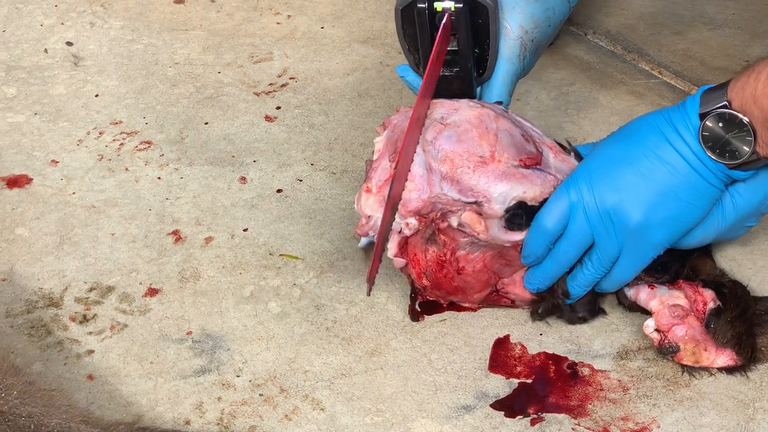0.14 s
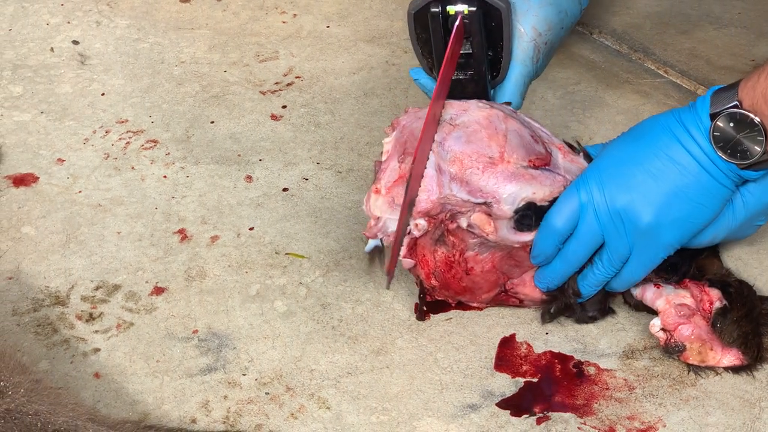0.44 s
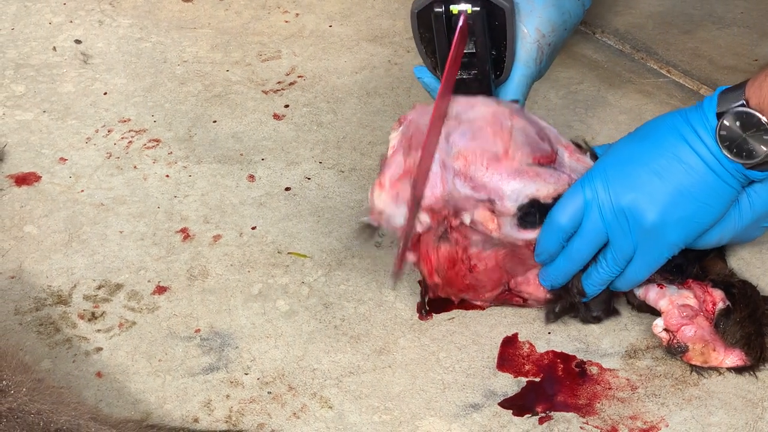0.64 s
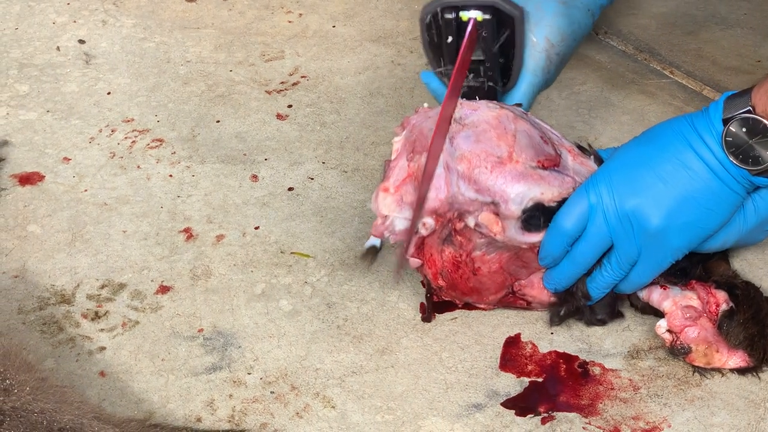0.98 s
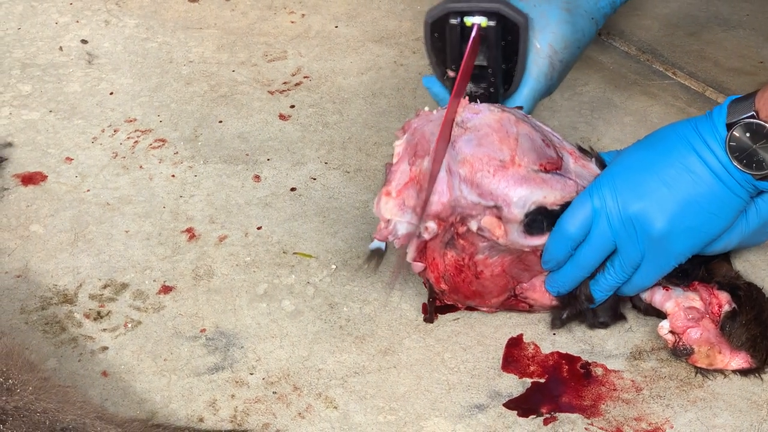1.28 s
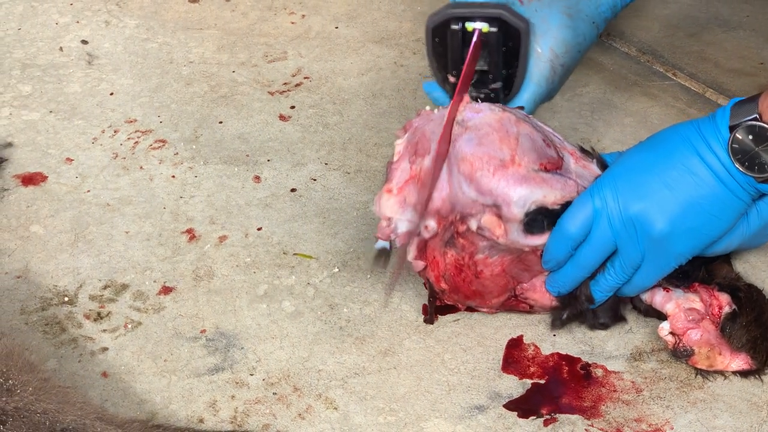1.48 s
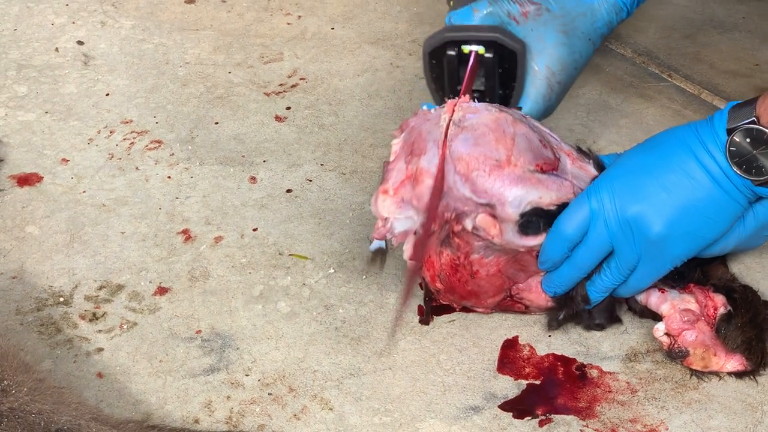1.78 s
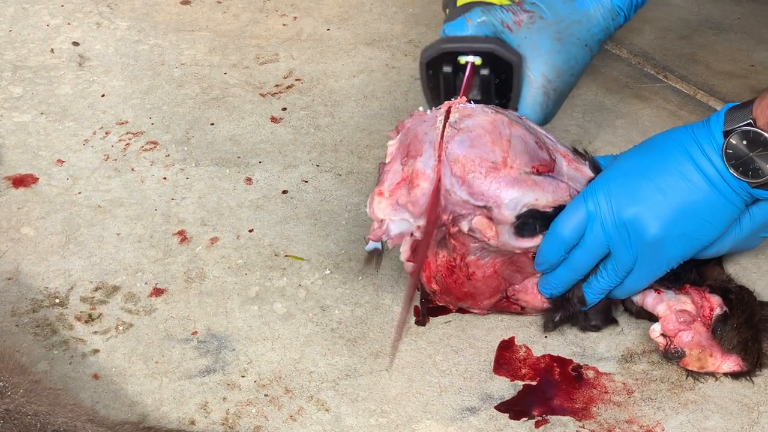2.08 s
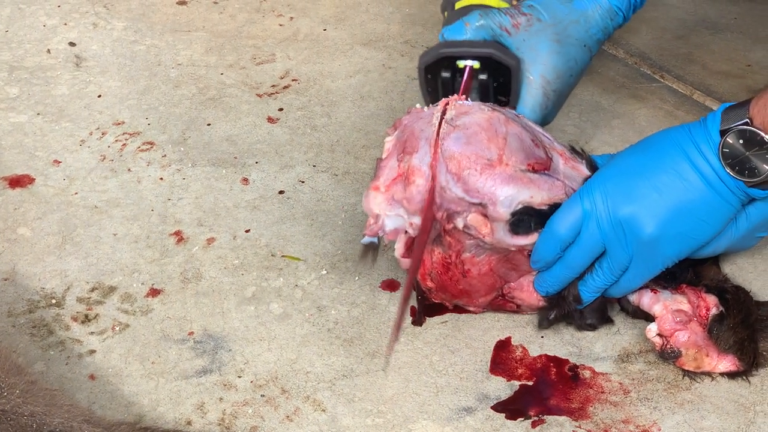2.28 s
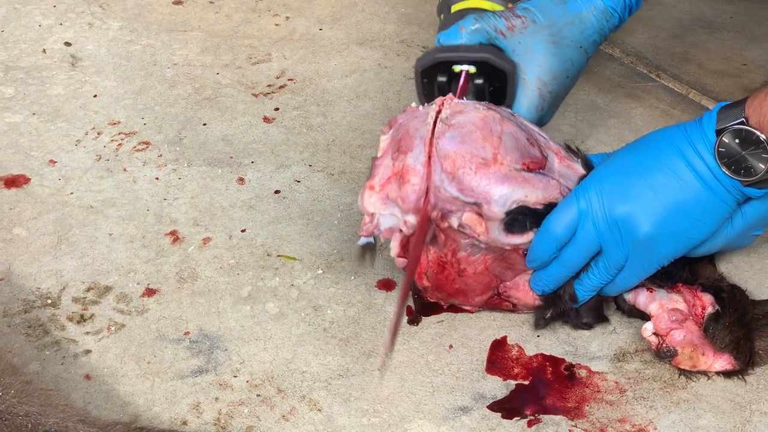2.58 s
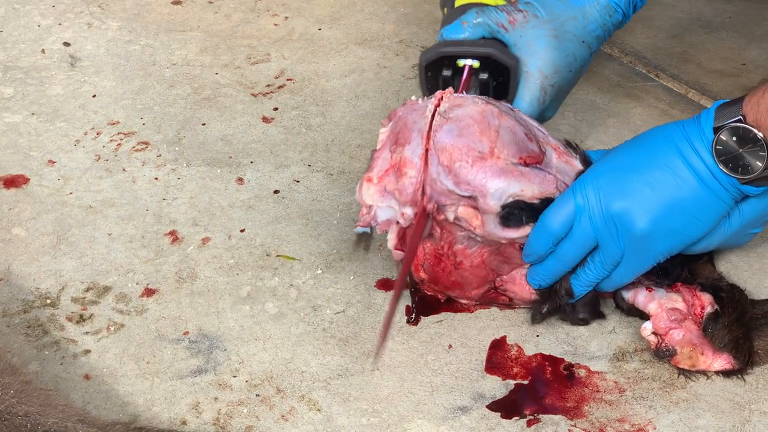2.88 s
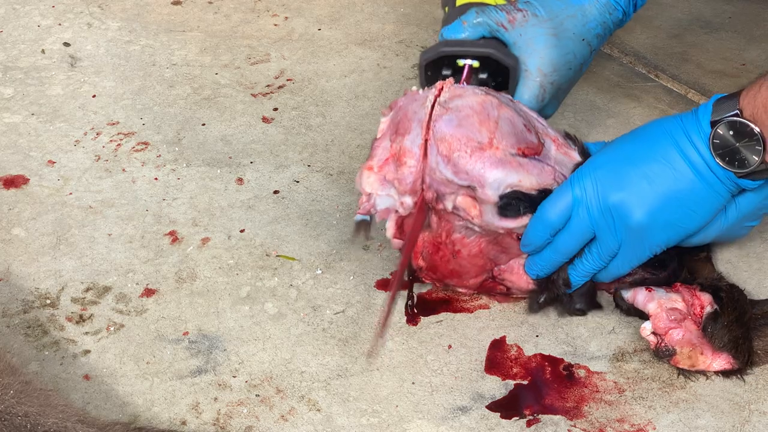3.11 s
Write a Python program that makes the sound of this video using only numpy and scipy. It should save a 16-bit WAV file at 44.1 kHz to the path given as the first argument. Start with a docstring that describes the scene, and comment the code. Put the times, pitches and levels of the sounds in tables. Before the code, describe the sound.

A cordless reciprocating saw clicks on and grinds loudly, steadily through bone in an echoing barn.

```python
"""A cordless reciprocating saw cuts through bone on the concrete floor of a barn: toothed noise rings the
saw and the bone, bursts knock at each end of the stroke, and narrow noise screeches where the blade binds.
Sine tones make the spinning motor and crank, a split carrier the whistle of the drive, short bursts the trigger.
Decaying noise is the echo of an earlier burst, which opens the scene before the trigger clicks.
Thumps of handling, rumbling and puffing air on the microphone and a quiet noise floor lie behind."""
import sys
import numpy as np
from scipy import signal
from scipy.fft import rfft, irfft
from scipy.io import wavfile
from scipy.ndimage import uniform_filter1d

SR = 44100
rng = np.random.default_rng(int(sys.argv[2]) if len(sys.argv) > 2 else 0)


def to_wav(s):
    """Save 16-bit WAV."""
    ch = np.atleast_2d(s).T  # columns
    pcm = np.round(np.clip(ch, -1, 1) * 32767)  # PCM
    wavfile.write(sys.argv[1], SR, pcm.astype(np.int16))


N = 143325
T, HZ = np.arange(N) / SR, np.fft.rfftfreq(2 * N, 1 / SR)
GEAR_RATIO = 7.32  # motor turns per blade stroke


def amp(db):
    """Decibels to gain."""
    return 10 ** (np.asarray(db) / 20)


def unit(x):
    """Scales to rms 1."""
    return x / np.sqrt(np.mean(x ** 2) + 1e-20)


def curve(rows, axis=1):
    """One column of a time table at every sample."""
    rows = np.array(rows)
    return np.interp(T, rows[:, 0], rows[:, axis])


def read(points, hz=HZ):
    """A frequency table on a log axis."""
    f, value = np.transpose(points)
    return np.interp(np.log(hz + 1), np.log(f + 1), value)


def shape(x, gain):
    """Filters by a gain per frequency."""
    return irfft(rfft(x, 2 * N) * gain)[..., :N]


def noise(colour):
    """Noise of rms 1 with the given spectrum."""
    return unit(shape(rng.standard_normal(N), amp(read(colour))))


def drift(hz):
    """Slow random movement of rms 1, up to the given rate."""
    return unit(shape(rng.standard_normal(N), 1 / (1 + (HZ / hz) ** 4)))


def blows(rows, t60, gain):
    """Sudden noise bursts that die away, coloured by a gain per frequency."""
    level = sum((T >= s) * amp(db - 60 * abs(T - s) / t60) for s, db in rows)
    return shape(level * rng.standard_normal(N), unit(gain))


# Where the teeth bite. Each row: place in the stroke (0-1), strength in dB over the steady scraping.
BITE_PLACES = [(.38, -1.5), (.6, -5), (.86, -9)]
BITE_LENGTH = 0.055  # decay, as a share of a stroke
CHIPS_PER_S, CHIP_SPREAD_DB, CHIP_SHARE = 2600, 2, 0.51  # share of the power of the grit
GRAB_DB, GRAB_HZ = 0.83, 46.6  # the blade catches unevenly: rms swing and top rate


def teeth(stroke):
    """Scraping and tiny chips, surging each time the teeth bite."""
    bite = sum(amp(db) * np.exp(-((stroke - place) % 1) / BITE_LENGTH) for place, db in BITE_PLACES)
    sign = rng.choice([-1, 1], N)
    size = amp(CHIP_SPREAD_DB * np.minimum(rng.exponential(1, N), 4))
    chips = sign * size * (rng.random(N) < CHIPS_PER_S / SR)
    scraping = rng.standard_normal(N)
    grit = np.sqrt(CHIP_SHARE) * unit(chips) + np.sqrt(1 - CHIP_SHARE) * scraping
    return unit(grit * (1 + bite) * amp(GRAB_DB * drift(GRAB_HZ)))


def rattle(stroke, count=90):
    """Gear and slider noise that repeats with each stroke: harmonics in random phase."""
    return unit(sum(np.cos(2 * np.pi * (k * stroke + rng.random())) for k in range(1, count)))


# Broad colour of the cut. Each row: frequency in Hz, relative level in dB.
CUT_COLOUR = [(40, -45), (130, -18), (300, -14), (430, -6.5), (680, -5.5), (1080, 3.5), (1600, -0.5),
              (2050, -2), (3600, -3), (5300, -1.5), (7400, -10.5), (9300, -5), (10300, -3.5), (12500, -7.5),
              (14400, -13.5), (14900, -22)]
# Resonances of housing, bone and blade. Each row: centre in Hz, width in Hz, boost in dB.
SAW_RESONANCES = [(515, 215, 7.5), (1323, 64, 7), (1704, 134, 5), (2207, 95, 2.5), (2840, 130, 5),
                  (4620, 190, 2.5), (6390, 1000, 4.5), (8110, 410, 11.5), (8615, 400, 8.5), (12860, 230, 7),
                  (14400, 1000, 8)]


def saw_colour():
    """Gain per frequency of saw and bone together: broad colour plus resonant peaks."""
    peaks = sum(db / (1 + (2 * (HZ - hz) / width) ** 2) for hz, width, db in SAW_RESONANCES)
    return amp(read(CUT_COLOUR) + peaks)


# Level of the cut, before the barn. Each row: time in seconds, body in dB, rasp in dB, treble in dB.
CUT_LEVELS = [(.55, -91, -76, -87), (.655, -37.5, -52, -52), (.68, -29.5, -42, -42), (.72, -23, -27, -31.5),
              (.77, -22, -23.5, -22.5), (.88, -21.5, -27, -23.5), (1.03, -22.5, -26.5, -22),
              (1.23, -24, -30, -22.5), (1.37, -26.5, -31, -26), (1.59, -26, -29, -27),
              (1.73, -26.5, -29.5, -28.5), (1.95, -27, -34, -27.5), (2.39, -27.5, -33, -26.5),
              (2.48, -24.5, -29, -26.5), (2.77, -25.5, -29, -27), (2.9, -27, -33.5, -25),
              (3.25, -27, -32, -24.5)]
BODY_TOP_HZ, RASP_TOP_HZ = 3920, 8070
RATTLE_SHARE = 0.087  # share of the body's power that repeats on every stroke
# the finest fizz is muffled as the blade sinks into the cut
FIZZ_HZ, FIZZ_START_DB, FIZZ_FADE_DB_PER_S = 8800, 4, 3


def cutting(stroke):
    """Teeth and rattle ring the saw and the bone; body, rasp and treble have their own levels."""
    grit, colour = teeth(stroke), saw_colour()
    low = 1 / (1 + (HZ / BODY_TOP_HZ) ** 10)
    not_high = 1 / (1 + (HZ / RASP_TOP_HZ) ** 20)
    scraped_body = unit(shape(grit, colour * low))
    rattling_body = unit(shape(rattle(stroke), colour * low))
    body = np.sqrt(1 - RATTLE_SHARE) * scraped_body + np.sqrt(RATTLE_SHARE) * rattling_body
    rasp = unit(shape(grit, colour * (not_high - low)))
    treble = unit(shape(grit, colour * (1 - not_high)))
    fizz = shape(treble, 1 - 1 / (1 + (HZ / FIZZ_HZ) ** 16))
    treble = treble + fizz * (amp(FIZZ_START_DB - FIZZ_FADE_DB_PER_S * T) - 1)
    body_gain, rasp_gain, treble_gain = [amp(curve(CUT_LEVELS, column)) for column in (1, 2, 3)]
    return body * body_gain + rasp * rasp_gain + treble * treble_gain


# Single extra knocks. Each row: time in seconds, strength in dB relative to an ordinary knock.
EXTRA_KNOCKS = [(1.186, 3), (1.595, 3.5), (1.658, -1), (2.2646, 0), (2.572, -1), (2.633, -9), (2.6947, -5),
                (2.8787, -6)]
# Ring of the knocks. Each row: frequency in Hz, relative level in dB.
KNOCK_RING = [(100, -15), (330, -18.5), (470, -1), (700, -8), (1050, -3), (1350, -0.5), (1650, -1.5),
              (2000, -11), (2850, -1), (3600, -14), (6000, -39), (15000, -32)]
KNOCK_DB = -7  # all knocks together, against the body of the cut
KNOCK_SPREAD_DB, KNOCK_BOUT_HZ, RETURN_DB = 2.5, 23, -8
KNOCK_JITTER, KNOCK_DECAY_S = 0.037, 0.0016  # jitter in half strokes


def knocks(stroke):
    """The blade knocks as it turns round, weaker on the return, in bouts; a few single knocks are added."""
    half = np.floor(2 * stroke + KNOCK_JITTER * drift(60))
    turning = np.diff(half, prepend=half[0]) > 0
    bouts = np.clip(drift(KNOCK_BOUT_HZ), -2, 1.3)
    hits = turning * amp(KNOCK_SPREAD_DB * bouts + RETURN_DB * (half % 2))
    for s, db in EXTRA_KNOCKS:
        hits[round(s * SR)] += amp(db)
    burst = signal.lfilter([1], [1, -np.exp(-1 / (KNOCK_DECAY_S * SR))], hits)
    ring = unit(shape(burst * rng.standard_normal(N), amp(read(KNOCK_RING))))
    return ring * amp(curve(CUT_LEVELS) + KNOCK_DB)


# The blade binds in the cut. Each row: middle in seconds, length in seconds, level in dB, pitch in Hz.
BINDING_CATCHES = [(0.752, 0.017, -20.5, 2370), (0.772, 0.01, -22, 2540), (0.789, 0.01, -20, 2780),
                   (.968, 0.018, -26, 2610), (1.58, 0.0084, -20.5, 2250), (1.597, 0.024, -26.5, 2880),
                   (1.636, 0.016, -28, 2230)]
CATCH_WIDTH_HZ, CHATTER_DB = 430, 6.5  # chatter swings this far up and down


def catches(turns):
    """The blade binds in brief narrow-band screeches, chattering once every two motor turns."""
    out = np.zeros(N)
    for s, length, db, hz in BINDING_CATCHES:
        band = 1 / (1 + (2 * (HZ - hz) / CATCH_WIDTH_HZ) ** 4)
        screech = unit(shape(rng.standard_normal(N), band))
        out += screech * amp(db) * np.exp(-(2 * (T - s) / length) ** 2)
    return out * amp(CHATTER_DB * np.sin(np.pi * turns))


# Motor shaft spinning up. Each row: time in seconds, speed in Hz.
SPIN_UP_SPEED = [(.635, 0), (.66, 45), (.69, 150), (.74, 290), (.80, 350)]
# Motor shaft sagging under load. Each row: time in seconds, speed in Hz.
LOADED_SPEED = [(.86, 366), (.95, 369), (1.15, 362), (1.45, 361), (1.72, 356.5), (2.05, 363), (2.2, 363),
                (2.4, 357), (2.7, 356), (3.0, 355), (3.25, 350)]
WOBBLE = .003  # rms, as a share of the speed


def shaft_speed():
    """The shaft spins up, then sags under load, with a slight random wobble."""
    return curve(list(SPIN_UP_SPEED) + list(LOADED_SPEED)) * (1 + WOBBLE * drift(14))


# Hum of the crank. Each row: multiple of the stroke rate, level in dB at full speed and reference load.
CRANK_HUM = [(3, -49.5), (5, -48), (7, -51), (9, -43.5), (10, -42), (11, -43), (17, -47.5), (27, -55)]
# Tone of the motor shaft. Each row: time in seconds, level in dB.
SHAFT_TONE = [(.6, -90), (.74, -48), (.82, -39), (.92, -30.5), (1.1, -40.5), (1.22, -36), (1.65, -43),
              (2.07, -38), (2.15, -50.5), (2.65, -43.5), (3.25, -47.5)]
CRANK_LOAD_SHARE, CRANK_BODY_DB = 0.57, -25.5  # dB of hum per dB of body; body level at reference load
FAN_ORDER, FAN_DB = 8, -42.5  # tones per turn; level at full speed
FLUTTER = 0.24  # rms unevenness of every tone's amplitude


def motor(speed, turns):
    """Tones locked to shaft, fan and crank; fan and crank grow with speed, the crank also with load."""
    def tone(cycles):
        """Sine of rms 1 with a slow random flutter."""
        return np.sqrt(2) * np.sin(2 * np.pi * (cycles + rng.random())) * (1 + FLUTTER * drift(4.9))
    crank = sum(amp(db) * tone(round(k) * turns / GEAR_RATIO) for k, db in CRANK_HUM)
    crank = crank * amp(CRANK_LOAD_SHARE * (curve(CUT_LEVELS) - CRANK_BODY_DB))
    fan = amp(FAN_DB) * tone(FAN_ORDER * turns)
    shaft = amp(curve(SHAFT_TONE)) * tone(turns)
    return shaft + (speed / speed.max()) ** 2 * (crank + fan)


# Switching whistle of the drive. Each row: time in seconds, level in dB.
WHISTLE_LEVEL = [(0, -53), (.1, -65), (.3, -99), (.526, -100), (.534, -49.5), (.64, -51), (.68, -38),
                 (.745, -34), (.85, -55)]
# Colour of the energised motor's buzz. Each row: frequency in Hz, relative level in dB.
BUZZ_COLOUR = [(200, -11), (700, -11.5), (1100, 1.5), (1500, -6), (2500, -12.5), (4700, -15), (7200, -23),
               (8300, -14), (11000, -26), (12700, -16), (15000, -34)]
# The motor buzzes as it brakes and as it is switched on again.
# Each row: start in seconds, starting level in dB before the rise, fade in dB per second.
MOTOR_BUZZES = [(.004, -36.5, 172), (0.531, -38.5, 55)]
WHISTLE_HZ, WHISTLE_WIDTH_HZ, WHISTLE_DITHER_HZ = 10060, 115, 400  # centre, rms wander, top wander rate
SIDEBAND_ORDER = 4.6  # sidebands lie this many shaft rates either side
BUZZ_RISE_S, BUZZ_ROUGH_DB = 0.004, -0.5


def drive(turns):
    """The energised motor buzzes; the switching whistle splits in two as the shaft starts to turn."""
    whistle_hz = WHISTLE_HZ + WHISTLE_WIDTH_HZ * drift(WHISTLE_DITHER_HZ)
    carrier = np.sin(2 * np.pi * np.cumsum(whistle_hz) / SR)
    split = unit(carrier * np.cos(2 * np.pi * SIDEBAND_ORDER * turns))
    whistle = split * amp(curve(WHISTLE_LEVEL))
    current = np.zeros(N)
    for s, db, fade in MOTOR_BUZZES:
        current += np.clip((T - s) / BUZZ_RISE_S, 0, 1) * amp(db - fade * abs(T - s))
    return whistle + noise(BUZZ_COLOUR) * current * amp(BUZZ_ROUGH_DB * drift(70))


# Jolts of the motor and gear slack. Each row: start in seconds, crack in dB, ring in dB.
JOLTS = [(.005, -32, -32.5), (.535, -36.5, -34), (0.571, -38, -39), (.670, -22.5, -36)]
# Modes of the housing. Each row: frequency in Hz, level in dB relative to the ring, t60 in seconds.
HOUSING_MODES = [(1065, -6, 0.15), (1076, 0, 0.14), (1325, -18, 0.13), (1520, -11, 0.063),
                 (1666, -8.5, 0.21), (2780, -13, .07)]
# Ticks of the trigger. Each row: start in seconds, level in dB.
TRIGGER_TICKS = [(.539, -45), (.5715, -33)]
# Thin colour of the ticks. Each row: frequency in Hz, relative level in dB.
TRIGGER_COLOUR = [(300, -17), (1400, 0), (3000, -16), (11800, -17), (12700, 4), (13600, -12), (15500, -1)]
CRACK_T60_S, TICK_T60_S = 0.022, 0.028


def clicks():
    """Short knocks that set decaying sine modes of the housing ringing, and thin noise ticks of the trigger."""
    ring = np.zeros(N)
    for s, _, ring_db in JOLTS:
        age = np.maximum(T - s, 0)
        for hz, db, t60 in HOUSING_MODES:
            ring += amp(ring_db + db - 60 * age / t60) * np.sin(2 * np.pi * hz * age)
    cracks = blows([row[:2] for row in JOLTS], CRACK_T60_S, saw_colour())
    ticks = blows(TRIGGER_TICKS, TICK_T60_S, amp(read(TRIGGER_COLOUR)))
    return ring + cracks + ticks


# Decay of the barn. Each row: frequency in Hz, t60 in seconds.
BARN_DECAY = [(100, 1), (1000, 1.6), (4000, 1.7), (9000, 0.37), (15000, 0.54)]


def die_away(x):
    """Lets each band fade at the pace of the barn."""
    hz, t, z = signal.stft(x, SR, nperseg=256)
    fade = amp(-60 * t / read(BARN_DECAY, hz)[:, None])
    return signal.istft(z * fade, SR, nperseg=256)[1][..., :x.shape[-1]]


def reflections(early_db=14, early_s=0.011):
    """Response of floor and barn at the two ports, even in level over frequency."""
    t = T[:SR]
    early = 1 + amp(early_db) * np.exp(-t / early_s)
    tail = die_away(rng.standard_normal((2, SR))) * (t > .001) * early
    wet = rfft(tail, 2 * N)
    return wet / np.sqrt(uniform_filter1d(abs(wet) ** 2, size=2000, axis=1))


# Share of direct sound. Each row: frequency in Hz, share of the power (0-1).
DIRECT_SHARE = [(200, 1), (500, 0.69), (680, 0.34), (1200, 0.9), (2100, 0.33), (2850, 0.42), (3700, 0.07),
                (5200, 0.61), (8200, 0.61), (10200, 1), (15000, 1)]
# Phase between the microphone ports. Each row: frequency in Hz, lead of the left in radians.
PORT_LEAD = [(300, 0), (1400, .3), (1950, -1.9), (2500, .2), (4500, 1.4), (5500, 3.1), (6200, 6.6),
             (7100, 9.4), (8400, 10.1), (9100, 8.2), (10200, 6.3), (11950, 3.1), (13300, .2), (14300, -1.6),
             (14800, -3.1), (16000, -3.6)]
SWAY_CYCLE_HZ = 3.5  # the tool moves about, so its reflections keep changing


def barn(x, count=4):
    """Direct sound at two ports, plus reflection patterns that swell in turn as the tool moves."""
    share = np.clip(read(DIRECT_SHARE), 0, 1)
    ports = np.exp(1j * read(PORT_LEAD) * np.array([[.5], [-.5]]))
    sway = [np.maximum(np.sin(2 * np.pi * (SWAY_CYCLE_HZ * T + k / count)), 0) for k in range(count)]
    wet = sum(rfft(x * weight, 2 * N) * reflections() for weight in sway)
    direct = rfft(x, 2 * N) * np.sqrt(share) * ports
    return irfft(direct + np.sqrt(1 - share) * wet)[:, :N]


# Balance of the microphone ports. Each row: frequency in Hz, left minus right in dB.
PORT_LEVELS = [(250, 0), (480, -5), (900, -0.5), (5000, 0.5), (5800, -6), (7500, 4.5), (8150, -8),
               (8900, -2.5), (10000, 0)]


def balance_ports(x):
    """Tilts left against right, half the difference on each port."""
    return shape(x, amp(read(PORT_LEVELS) * np.array([[.5], [-.5]])))


# Colour of the echo. Each row: frequency in Hz, relative level in dB.
ECHO_COLOUR = [(100, -39), (500, 16), (750, -3), (950, -15), (1080, 9.5), (1350, -2), (1650, -2),
               (2100, -16), (2700, -7), (4000, -17), (7200, -11), (8300, 2), (9300, 0), (13000, -12),
               (15500, -27)]


def earlier_echo(start_db=-42.5):
    """Dying echo of an earlier burst: separate noise at each port, fading at the barn's pace."""
    return amp(start_db) * die_away(np.array([noise(ECHO_COLOUR), noise(ECHO_COLOUR)]))


# Dull bumps of handling. Each row: start in seconds, level in dB.
HANDLING_BUMPS = [(.003, -34), (.027, -22), (.078, -25), (.184, -26.5), (.667, -23), (1.792, -28.5),
                  (2.755, -34)]
# Colour of the bumps. Each row: frequency in Hz, relative level in dB.
HANDLING_COLOUR = [(30, -16), (90, 1.5), (280, 2), (550, -9.5), (900, -37), (3000, -45), (12000, -56)]


def handling(t60_s=0.13):
    """Dull thumps of handling: low noise bursts that die away."""
    return blows(HANDLING_BUMPS, t60_s, amp(read(HANDLING_COLOUR)))


# Air on the microphone. Each row: time in seconds, level in dB.
WIND_LEVEL = [(0, -33), (.03, -25), (.09, -32), (.14, -36), (.23, -32.5), (.33, -42.5), (.38, -39),
              (.5, -35), (.57, -35.5), (.65, -35), (.68, -23), (.79, -20), (.87, -38), (.93, -28),
              (1.06, -39.5), (1.25, -33), (1.35, -49), (1.66, -45), (1.71, -39), (1.76, -50), (1.85, -34.5),
              (1.97, -44), (2.05, -50), (2.4, -50), (2.47, -40), (2.71, -37.5), (2.81, -30), (2.88, -46),
              (3.03, -36.5), (3.1, -44), (3.25, -43)]
# Colour of the rumble. Each row: frequency in Hz, relative level in dB.
RUMBLE_COLOUR = [(20, -24), (38, -4.5), (60, 4.5), (110, -1.5), (200, -8.5), (350, -17.5), (700, -32.5),
                 (2000, -45), (8000, -66)]
# Single puffs of air. Each row: start in seconds, peak level in dB, starting pitch in Hz.
AIR_PUFFS = [(0.183, -13, 200), (0.366, -35, 149), (0.441, -29.5, 190), (0.542, -24.5, 109),
             (0.671, -14, 90), (0.693, -21, 111), (0.719, -13, 143), (0.734, -21, 202), (0.76, -9.5, 252),
             (0.814, -17.5, 236), (1.789, -26.5, 287), (2.797, -21, 175), (2.985, -34, 320)]
PUFF_PEAK_S, PUFF_END_HZ, PUFF_SAG_S = 0.0076, 59.5, 0.012  # time to the peak, final pitch, pitch decay


def wind():
    """Lumpy noise rumble, and sine puffs whose pitch falls as they pass."""
    out = noise(RUMBLE_COLOUR) * amp(curve(WIND_LEVEL))
    for s, db, start_hz in AIR_PUFFS:
        age = np.maximum(T - s, 0)
        hz = PUFF_END_HZ + (start_hz - PUFF_END_HZ) * np.exp(-age / PUFF_SAG_S)
        swell = (age / PUFF_PEAK_S * np.exp(1 - age / PUFF_PEAK_S)) ** 2
        out += amp(db) * swell * np.sin(2 * np.pi * np.cumsum(hz * (age > 0)) / SR)
    return out


# Quiet air of the barn. Each row: frequency in Hz, relative level in dB.
AIR_COLOUR = [(40, -22), (300, -11), (1000, 7.5), (2000, 1.5), (4000, -12), (8000, -33), (15000, -42)]


def quiet_air(level_db=-56):
    """Steady coloured noise, separate at each port."""
    return amp(level_db) * np.array([noise(AIR_COLOUR), noise(AIR_COLOUR)])


def scene():
    """The saw in the barn, with handling bumps and air on the microphone."""
    speed = shaft_speed()
    turns = np.cumsum(speed) / SR
    stroke = turns / GEAR_RATIO
    blade = cutting(stroke) + knocks(stroke) + catches(turns)
    in_barn = barn(blade + drive(turns) + clicks())
    saw = balance_ports(in_barn + motor(speed, turns))  # the motor tones stay dry
    return saw + earlier_echo() + handling() + wind() + quiet_air()


def record(dry, edge_hz=15750):
    """The recorder's band limit: a steep low-pass."""
    low_pass = signal.firwin(711, edge_hz, window=("kaiser", 9), fs=SR)
    return signal.oaconvolve(dry, low_pass[None], "same")


dry = scene()
out = record(dry)
to_wav(out)
```